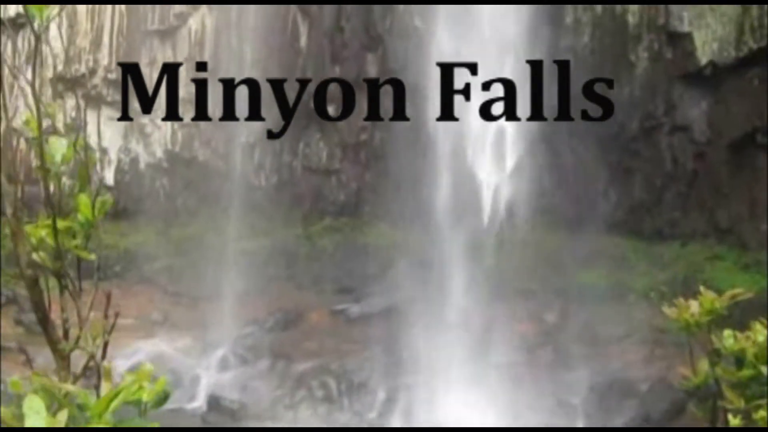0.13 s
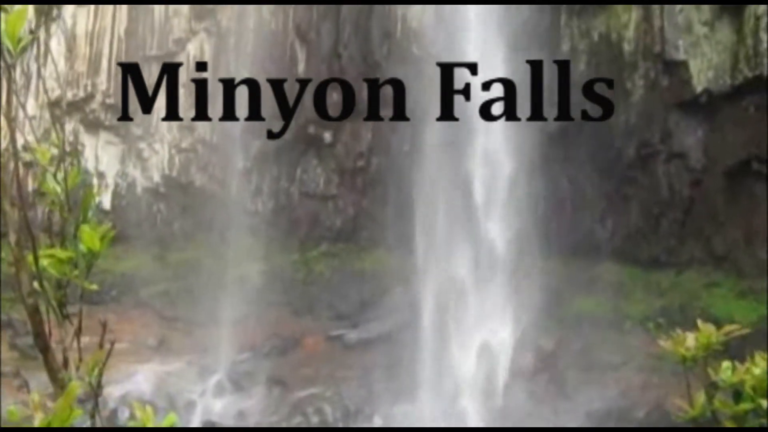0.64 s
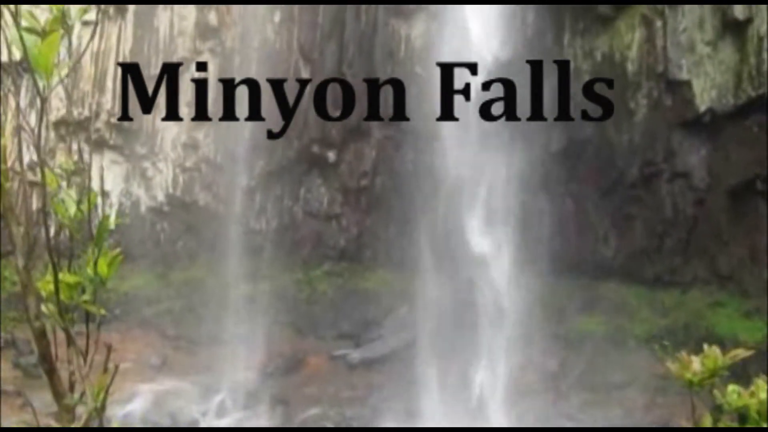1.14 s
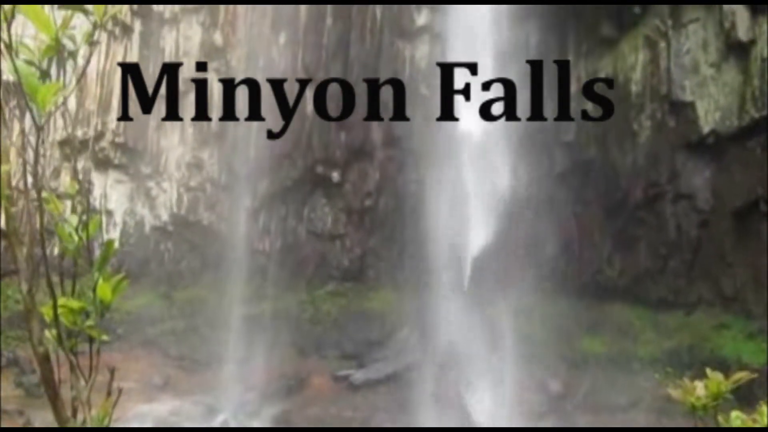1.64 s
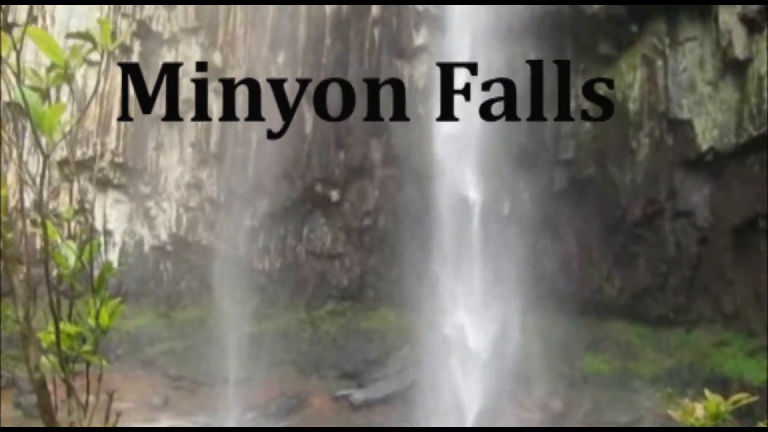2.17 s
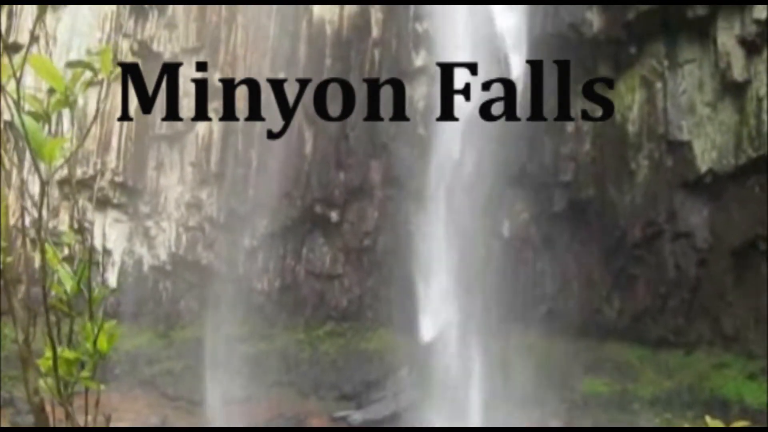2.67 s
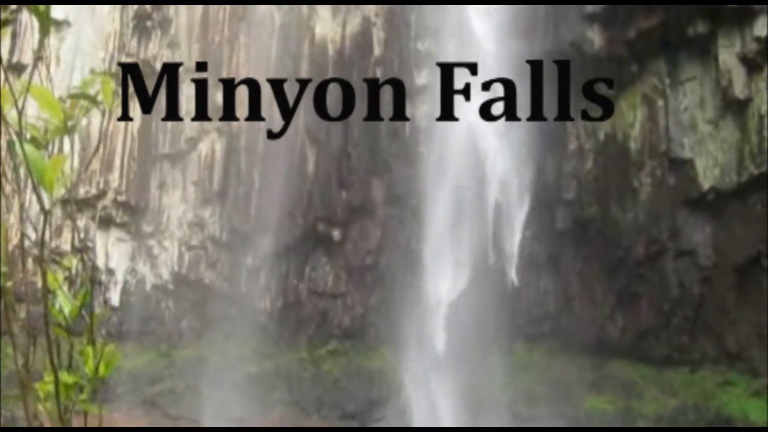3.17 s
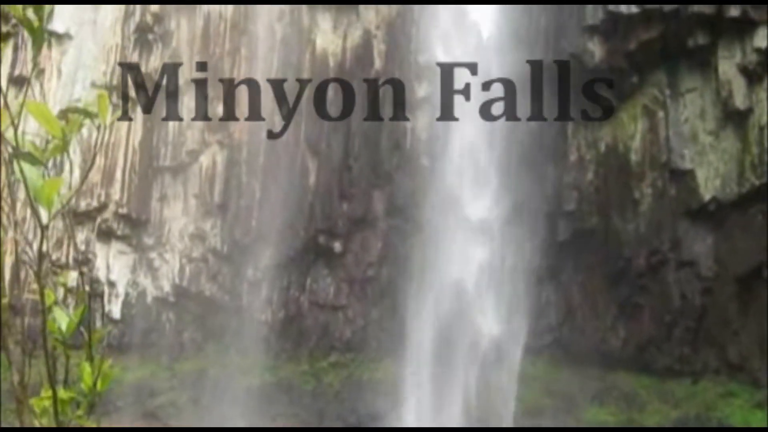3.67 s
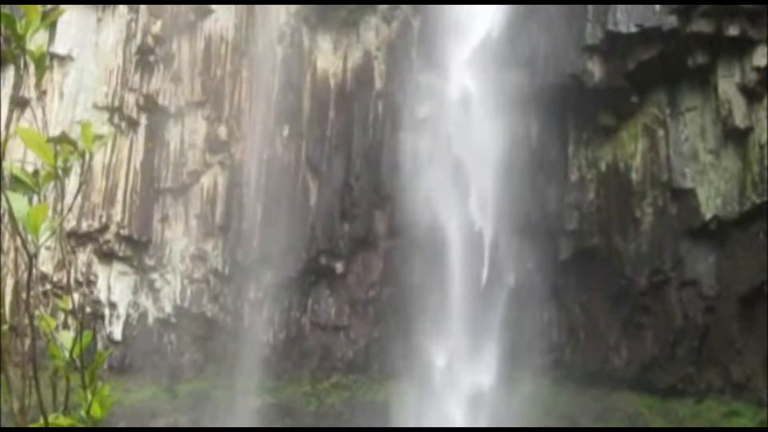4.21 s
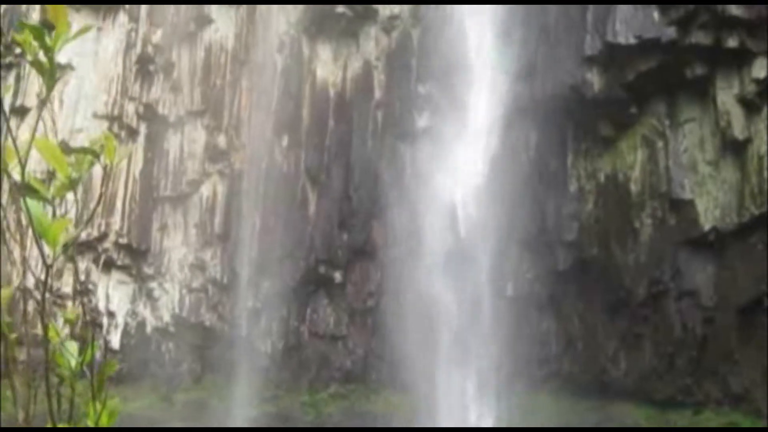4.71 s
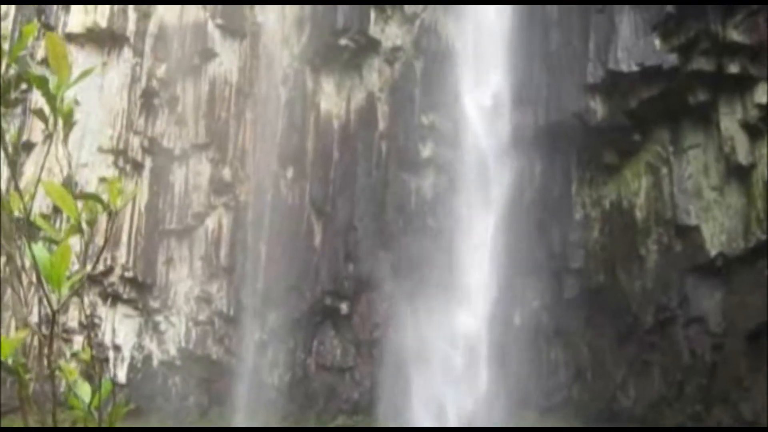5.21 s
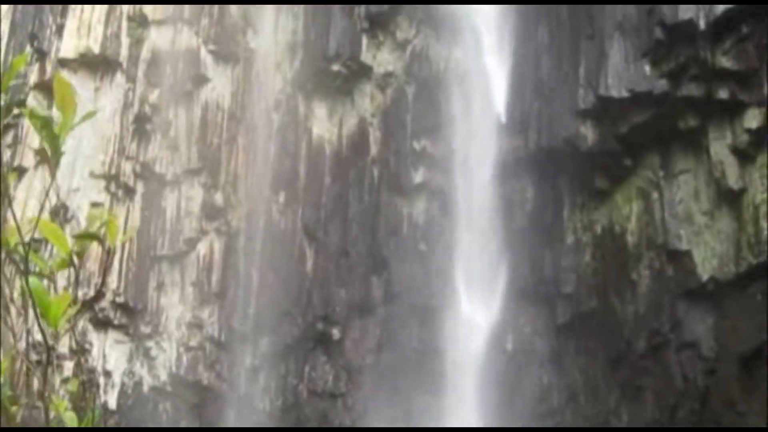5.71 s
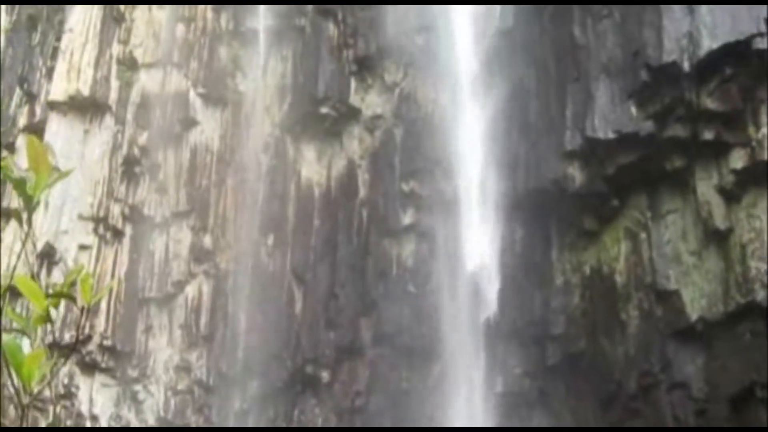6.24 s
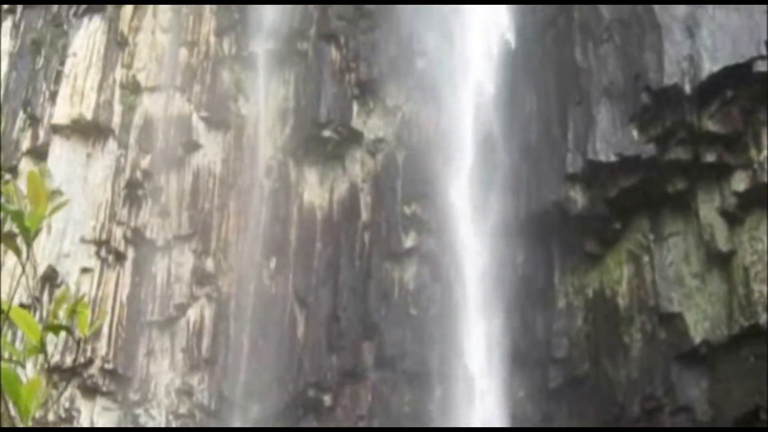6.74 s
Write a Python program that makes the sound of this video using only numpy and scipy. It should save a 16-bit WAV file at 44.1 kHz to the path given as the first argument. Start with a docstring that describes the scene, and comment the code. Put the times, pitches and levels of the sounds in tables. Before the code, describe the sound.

A tall waterfall pours onto rocks and a pool in the open air, heard from some way off through a small handheld microphone with dull, slightly gritty treble. From 0 to about 2.3 seconds it is a thin, steady hiss concentrated in the upper mids, with no single drops standing out and tiny rapid swells inside it. Soft low wind thumps touch the microphone near 0.2, 0.9 to 1.0 and 1.7 to 1.9 seconds. From 2.3 seconds the colour wavers toward a fuller, broader roar, with a brief dip at 2.5 and further short dips between 3.5 and 4. It grows fullest after about 4.7 seconds. Faint, lumpy low wind runs beneath throughout. The hardest buffets, a cluster of short dull bumps with a gust, come from 5.7 to 6.0 seconds. The roar then continues steadily and stops abruptly near 6.9 seconds, without a fade.

```python
"""A tall waterfall lands on rocks and a pool, heard from some way off through a small handheld microphone.
It opens as a thin hiss: noise standing for countless drops, while wind buffets thump as short, skewed swings.
From about 2.3 s the hand tilts the microphone upward, and a blend of two colours wavers toward a fuller roar;
the level dips briefly at 2.5 s and between 3.5 and 4 s. The hardest buffets and wind come near 5.7 to 6 s.
Low, lumpy wind noise runs throughout; a slow converter dulls the treble and mirrors it faintly above."""
import sys
import numpy as np
from scipy import signal
from scipy.fft import rfft, irfft, next_fast_len
from scipy.io import wavfile

SR = 44100
rng = np.random.default_rng(int(sys.argv[2]) if len(sys.argv) > 2 else 0)


def boost(x):
    """Linear amplitude factor 10**(x/20) for a level x in decibels (scalar or array-like)."""
    u = np.asarray(x, float) / 20
    return 10 ** u


def bounce(signal):
    """Save signal as a 16-bit WAV file at the path given by the first command-line argument."""
    frames = np.transpose(np.atleast_2d(signal))
    limited = np.clip(frames, -1, 1)
    pcm = np.round(limited * 32767).astype(np.int16)
    wavfile.write(sys.argv[1], SR, pcm)


N = 302526  # length [samples]

# slow level of the falling water, before its brief dips: (time [s], level [dB])
WATER_LEVEL = [(0.0, -33.5), (1.78, -33), (2.06, -33.5), (2.62, -32.5), (2.9, -33), (3.9, -32.5),
               (4.39, -33), (5.44, -32.5), (6.86, -32.5)]
# share of the fuller colour, near 0 = aimed down at the pool, near 1 = up the cliff; it rises slowly as the
# microphone tilts up, while its quicker wiggles, and values beyond 0 and 1, simply wander: (time [s], blend [no
# unit])
FULL_SHARE = [(0.0, 0.12), (1.0, -0.16), (2.3, 0.0055), (2.88, 0.43), (3.25, 0.12), (3.55, 0.27),
              (4.65, 0.42), (4.9, 0.85), (5.3, 0.63), (6.1, 1.32), (6.86, 1.06)]
# water colour through the housing, aimed down; only the shape counts: (frequency [Hz], density [dB per Hz])
POOL_COLOUR = [(60, -23), (200, -17.5), (320, -14.5), (480, -13.5), (600, -10.5), (1300, -8), (1550, -9.5),
               (2250, -8), (2500, -6.5), (2750, 0), (3100, -5), (3550, 0), (3850, -2.5), (4150, -2.5),
               (4600, -1)]
# the same, aimed up the cliff: (frequency [Hz], density [dB per Hz])
CLIFF_COLOUR = [(60, -22), (180, -15.5), (320, -10), (480, -10.5), (600, -5.5), (1000, -4.5), (1350, -3),
                (1600, -4), (2000, -4.5), (2400, -3), (2750, -3), (3100, -2), (3600, -3), (4150, -5.5),
                (5300, 0.5)]
# microphone treble, falling steeply to half the converter rate: (frequency [Hz], gain [dB])
MIC_TREBLE = [(4150, 1.5), (4500, -6), (5000, -15.5), (5500, -26), (5850, -33), (6000, -41), (6200, -72)]
# strength of the wind on the microphone port: (time [s], level [dB])
WIND_LEVEL = [(0.0, -59), (0.4, -59.5), (0.6, -63), (0.92, -57.5), (1.11, -68), (1.85, -61), (2.5, -64.5),
              (2.92, -66.5), (3.9, -62), (4.4, -67.5), (5.72, -63.5), (5.84, -52), (6.0, -50.5), (6.1, -61),
              (6.59, -64), (6.86, -60)]
# wind buffets: (time [s], peak of the outline [dB], pitch at that time [Hz], length [ms])
BUFFET_LIST = [(0.242, -42, 122.0, 7.8), (0.901, -38, 108.0, 5.8), (0.933, -38, 163.0, 5.2),
               (0.988, -31, 180.0, 4.6), (1.716, -41.5, 113.0, 6.7), (1.846, -39, 136.0, 3.8),
               (1.869, -34.5, 146.0, 5.4), (3.909, -38, 167.0, 4.4), (5.73, -20.5, 175.0, 4.5),
               (5.811, -42, 132.0, 9.2), (5.872, -34.5, 108.0, 9.2), (5.915, -24.5, 209.0, 5.8),
               (5.958, -38.0, 141.0, 7.3), (5.978, -28, 170.0, 4.5), (6.016, -42, 107.0, 12)]
# how much of the mirror image the resampler lets through: (frequency [Hz], gain [dB])
MIRROR_GAIN = [(5800, -52), (6000, -0.5), (6300, -3.5), (7000, -14), (7700, -27.5), (8100, -38.5),
               (8350, -49.5), (8500, -81.5)]
# brief dips of the roar; a negative depth is a slight lift: (time of the lowest point [s], depth [dB])
DIPS = [(0.29, 0), (2.48, 2.5), (3.551, 3.5), (3.78, 3), (3.97, 1.5), (4.25, 0.1), (5.79, -0.1)]

DIP_FALL_S, DIP_RETURN_S = 0.02, 0.058  # time scales before and after the lowest point
CONVERTER_HZ = 12000  # sampling rate of the converter
BIAS = -0.00156       # constant offset of the converter, full scale = 1


def in_time(rows):
    """Join each column of a time table by straight lines, at every sample."""
    s, *columns = np.transpose(rows)
    return [np.interp(np.arange(N) / SR, s, column) for column in columns]


def rms_one(x):
    """Scale to an rms (average strength) of 1."""
    return x / np.sqrt(np.mean(x ** 2) + 1e-20)


def coloured(x, spectrum):
    """Strengthen or weaken each frequency by a (Hz, dB) table."""
    size = next_fast_len(N)
    log_hz = np.log(np.arange(1, size // 2 + 2) * SR / size)
    table_hz, table_db = np.transpose(spectrum)
    gain = boost(np.interp(log_hz, np.log(table_hz), table_db))
    return irfft(rfft(x, size) * gain, size)[:N]


def drift(rate_hz):
    """Slow random wandering of rms 1: noise at every 40th sample, smoothed by two equal low-passes."""
    r = np.exp(-2 * np.pi * rate_hz * 40 / SR)
    noise = rng.standard_normal(N // 40 + 2002)
    slow = signal.lfilter([1], [1, -2 * r, r * r], noise)[2000:]  # skip the start of the filter
    return np.interp(np.arange(N) / 40, np.arange(len(slow)), rms_one(slow))


def countless_drops(together_db, neighbours_db, own_db):
    """Impacts too many to count add up to flat noise; clumps of water make each half octave swell and sag."""
    size = next_fast_len(N)
    half_octaves = 2 * np.log2(np.arange(1, size // 2 + 2) * SR / size / 60)  # counted from 60 Hz
    white = rfft(rng.standard_normal(size))
    together = drift(11.0)
    shared = drift(5.0)
    out = np.zeros(N)
    for k in range(16):
        # overlapping triangles that sum to one
        window = np.clip(1 - np.abs(np.clip(half_octaves, 0, 15) - k), 0, 1)
        following = drift(3.9)  # shared with the band above
        neighbours = (1 - k / 20.0) * (shared + following)  # slow patches fade toward the treble
        swell_db = together_db * together + neighbours_db * neighbours + own_db * drift(20.0)
        out += boost(swell_db) * irfft(white * window, size)[:N]
        shared = following
    return out


def dips_db():
    """Sum of the brief changes in level: the dips drop fast and come back more slowly."""
    t = np.arange(N) / SR
    out = np.zeros(N)
    for s, depth_db in DIPS:
        time_scale = np.where(t < s, DIP_FALL_S, DIP_RETURN_S)
        out -= depth_db * np.exp(-((t - s) / time_scale) ** 2)
    return out


def waterfall():
    """The same falling water heard in two colours, blended by a share that rises as the microphone tilts up and
    wavers on its own."""
    drops = countless_drops(together_db=0.36, neighbours_db=0.55, own_db=0.61)
    down = rms_one(coloured(coloured(drops, POOL_COLOUR), MIC_TREBLE))
    up = rms_one(coloured(coloured(drops, CLIFF_COLOUR), MIC_TREBLE))
    share, = in_time(FULL_SHARE)
    level_db, = in_time(WATER_LEVEL)
    return boost(level_db + dips_db()) * ((1 - share) * down + share * up)


def buffets(phase=0.3, sag=0.33, front=0.61, back=1.4):
    """Each buffet pushes the diaphragm through about one cycle: a quick front, a slower and lower swing back."""
    out = np.zeros(N)
    t = np.arange(N) / SR
    for s, peak_db, hz, length_ms in BUFFET_LIST:
        near = slice(max(round((s - 0.04) * SR), 0), round((s + 0.04) * SR))
        u = t[near] - s
        spread = length_ms / 2355  # full width at half height [ms] to spread [s]
        fall = sag / max(hz * length_ms / 1000, 0.75) ** 3.4  # a buffet of several cycles holds its pitch
        bend = 1 - fall * np.tanh(u / spread / 2)
        swing = np.cos(2 * np.pi * hz * u * bend + phase)
        skewed = spread * np.where(u < 0, front, back)
        out[near] += boost(peak_db) * np.exp(-u ** 2 / (2 * skewed ** 2)) * swing
    return out


def wind(low_hz=45, high_hz=170, lumpy_db=3.5):
    """Eddies over the microphone port make low noise whose strength wanders in lumps."""
    band = signal.butter(2, [low_hz, high_hz], "band", fs=SR, output="sos")
    lumpy_noise = rng.standard_normal(N) * boost(lumpy_db * drift(15.0))
    eddies = signal.sosfilt(band, lumpy_noise)
    level_db, = in_time(WIND_LEVEL)
    return boost(level_db) * rms_one(eddies)


def scene():
    """Water, buffets and wind together in one channel."""
    return (waterfall() + buffets() + wind())[None]


def band_limit(x):
    """A steep low-pass at the top of the band."""
    return signal.sosfilt(signal.butter(12, 9060, fs=SR, output="sos"), x)


def record(dry):
    """Slow sampling mirrors the spectrum about half the converter rate, and the converter adds a small bias."""
    t = np.arange(N) / SR
    mirrored = 2 * dry[0] * np.cos(2 * np.pi * CONVERTER_HZ * t)
    mix = dry + coloured(mirrored, MIRROR_GAIN) + BIAS
    return band_limit(mix)


dry = scene()
out = record(dry)
bounce(out)
```